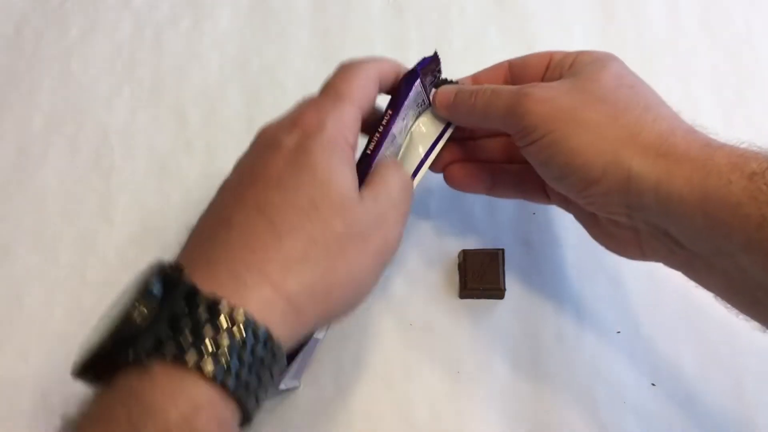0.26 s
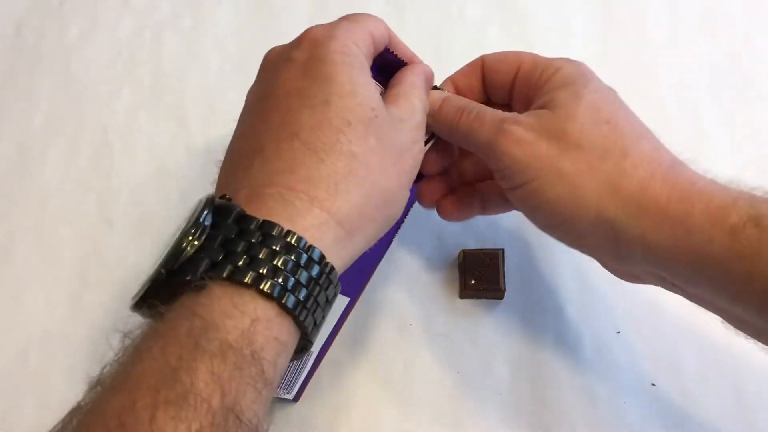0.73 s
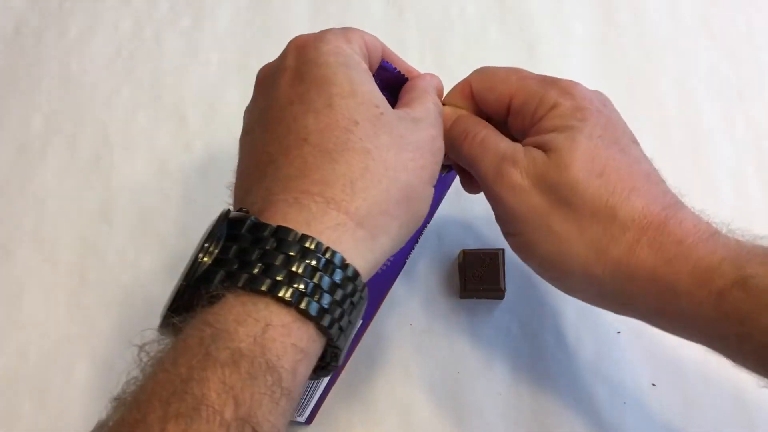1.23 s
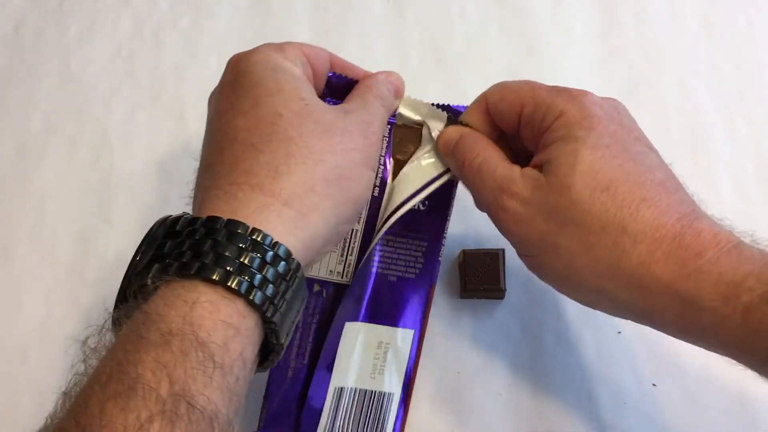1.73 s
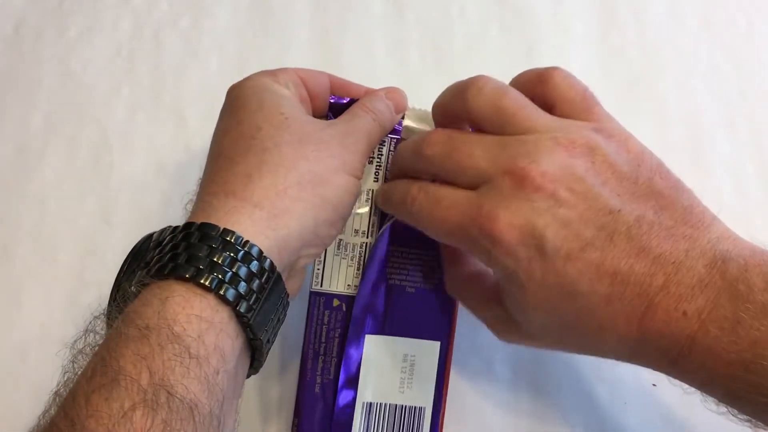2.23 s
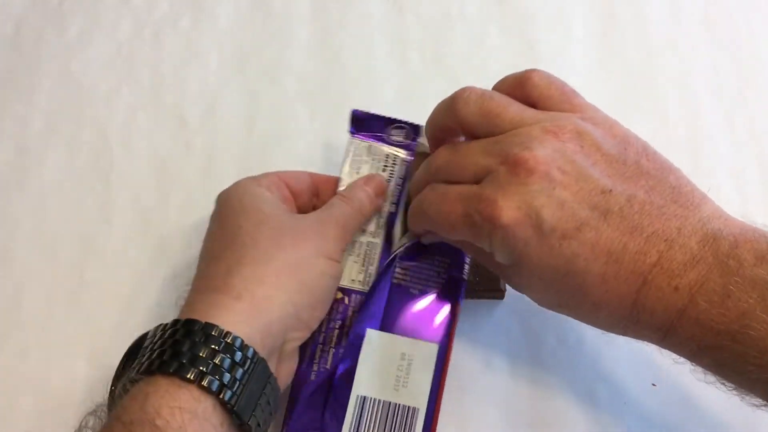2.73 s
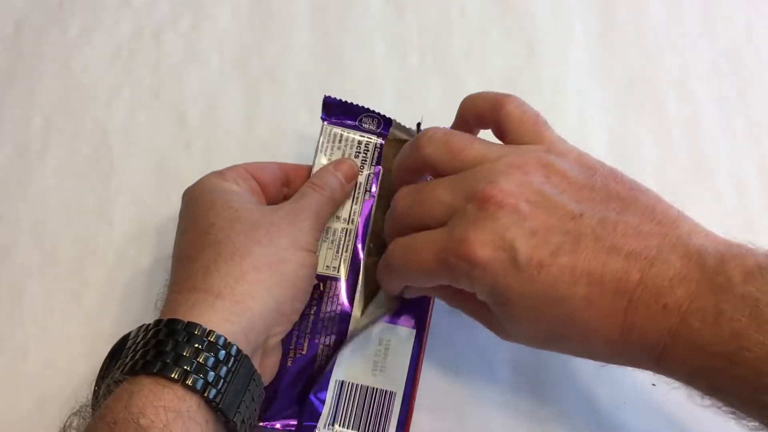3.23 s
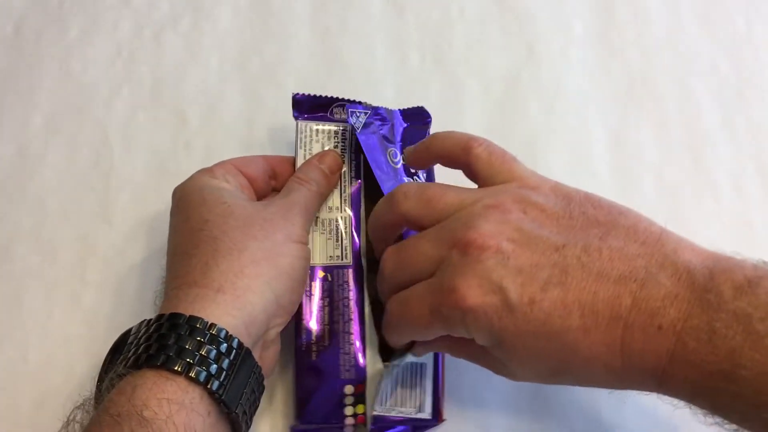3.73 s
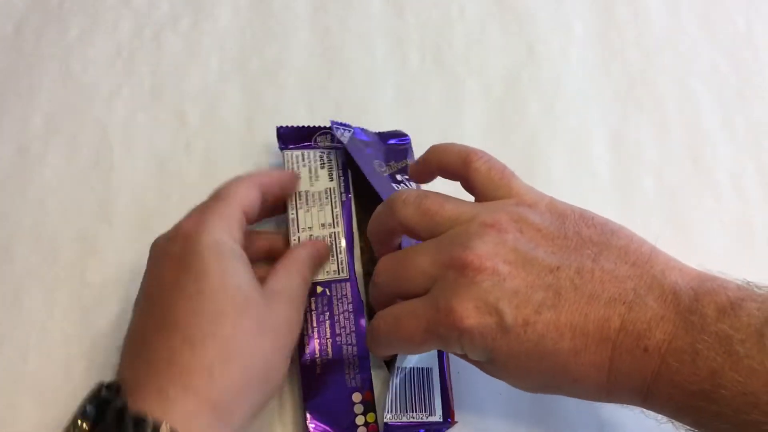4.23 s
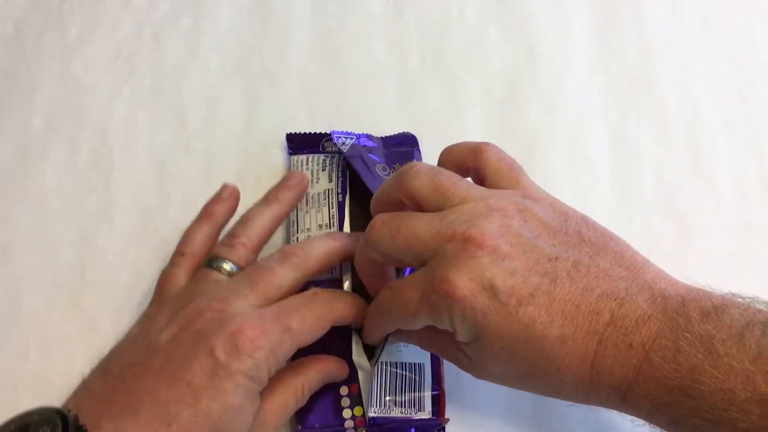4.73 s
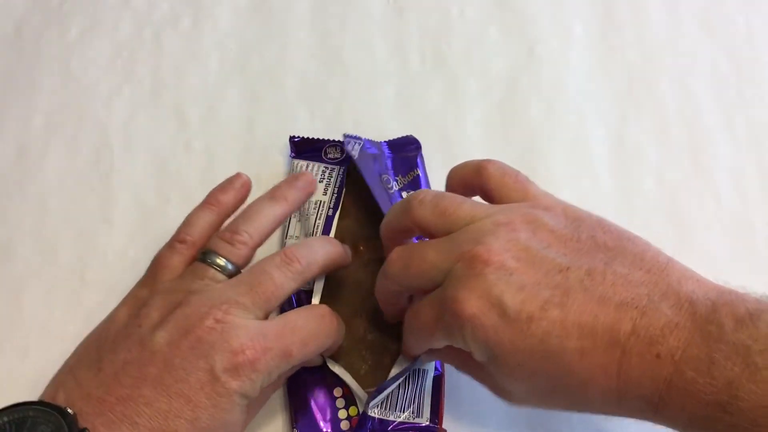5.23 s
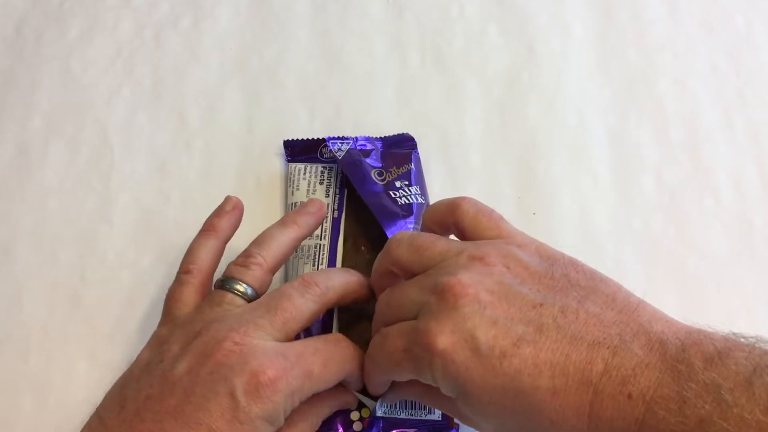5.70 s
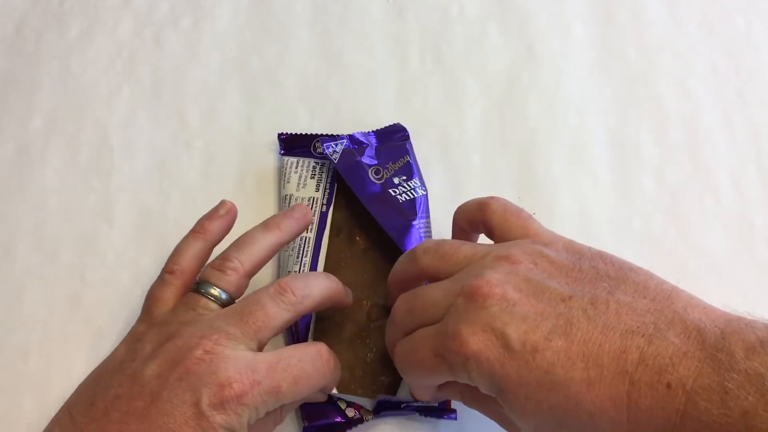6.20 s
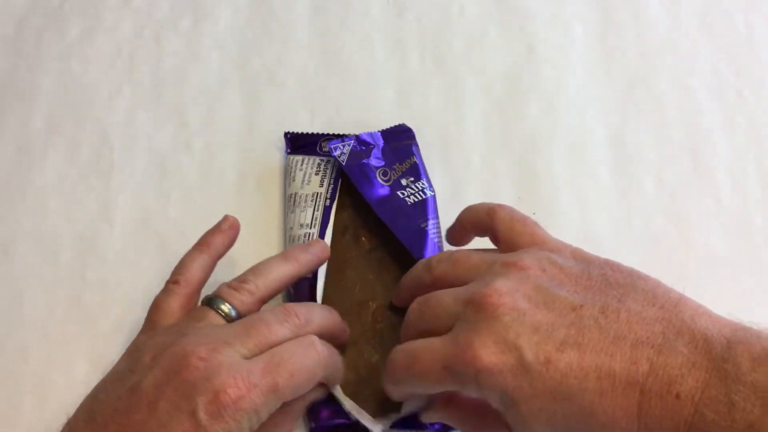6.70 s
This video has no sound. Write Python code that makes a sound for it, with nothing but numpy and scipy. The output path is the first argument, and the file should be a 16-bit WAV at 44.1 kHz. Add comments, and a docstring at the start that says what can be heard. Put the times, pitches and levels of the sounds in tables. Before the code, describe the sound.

A foil-and-paper chocolate wrapper is opened by hand on a table, close to the microphone in a small, quiet room with faint air. From 0 to 1.3 seconds there are light crinkles, small ticks and soft rustling, with barely felt hand thumps. At 1.4 a bright, sharp snap stands out, then lower, papery pops around 1.8 and 2.0. From 2.5 to 3 the crackling thickens; a strong, hollow papery pop comes at 3.2 and a hard double snap near 3.8. Around 4.4 a short, dull woody knock sounds with crisp cracks. Peeling continues in uneven bursts of rasp and foil hiss, with a sharp snap at 4.8, a bright one at 5.5 and more pops to 6.1. It then thins to faint rustling, a small tick at 6.5, and a last flurry of crinkles from 6.7 to the end.

```python
"""A foil-and-paper wrapper of a chocolate bar is peeled open by hand on a table, close to one microphone.
Creases snap: each gives a bright crack and rings a small flat facet of the sheet. Between snaps, shaped noise
and tiny chirping crinkles make the paper rasp and the foil hiss. Knocks ring the table's own notes and a slowly
swelling room mode, hand presses thump softly, and folds drag out short rough notes. Fading noise makes a small
room's echoes over faint air; a table reflection hollows the treble."""
import sys
import numpy as np
from scipy import signal
from scipy.fft import rfft, irfft, next_fast_len
from scipy.io import wavfile
from scipy.ndimage import uniform_filter1d, map_coordinates

SR = 44100
rng = np.random.default_rng(int(sys.argv[2]) if len(sys.argv) > 2 else 0)


def generate_wav(sig):
    """Save sig (samples, or channels by samples) to the path in sys.argv[1] as 16-bit PCM at SR."""
    pcm = np.round(np.clip(np.atleast_2d(sig).T, -1, 1) * 32767).astype(np.int16)
    wavfile.write(sys.argv[1], SR, pcm)


N = 306936  # length of the scene [samples]

# In all tables dB values are relative, and t60 is the time to fade by 60 dB.
# loud creases that buckle: (time [s], facet pitch [Hz], facet level [dB], crack level [dB])
LOUD_CREASES = [(0.0757, 4060, -27, -14), (0.1446, 5430, -5.5, -6), (0.2098, 2860, -7, -22),
                (0.434, 9000, -14.5, -25), (0.469, 2530, -7, -7), (0.641, 1750, -10, -19.5),
                (0.748, 2180, -13, -21), (0.7937, 1630, -21, -16), (0.921, 4050, -12.5, -14.5),
                (1.0349, 1950, -14.5, -23), (1.313, 1610, -16, -42), (1.407, 6100, 8, -1),
                (1.42, 1520, -9, -10), (1.4255, 1450, 1.5, -10), (1.454, 4900, -17, -12),
                (1.7563, 1910, -4, -27), (1.7887, 1320, -3, -26), (1.8285, 980, -4.5, -30),
                (1.8333, 1500, -6.5, -8.5), (2.023, 930, 1, -12), (2.032, 1100, -5.5, -6),
                (2.2344, 1230, 0, -5), (2.3751, 2540, -10, -24.5), (2.447, 2940, -16, -17.5),
                (2.535, 1000, -5.5, -18), (2.543, 3320, -8.5, -35), (2.6948, 4100, -2, -11),
                (2.771, 4730, -1.5, -10), (2.788, 1070, -6, -4), (2.8022, 1750, -1.5, -19),
                (2.836, 1550, 7, -8), (2.89, 1350, 3, -22), (2.9515, 1620, -15, -6.5),
                (2.9848, 1310, -4.5, -11), (3.0504, 1287, -2.5, -16.5), (3.1723, 3430, -8, -23),
                (3.2315, 1150, 13, -2), (3.264, 4700, -0.5, -14), (3.377, 2188, -4, -34),
                (3.3823, 1210, 6, -30), (3.492, 3090, -8, -18), (3.6954, 3480, 1.5, -6),
                (3.7278, 3050, -5, -19), (3.7742, 1440, 7, 1), (3.7781, 2300, 8.5, 0),
                (4.0065, 1865, -3, -18), (4.013, 3480, -7, -8), (4.13, 2090, -10.5, -24.5),
                (4.3939, 1110, 1.5, -25), (4.4154, 3280, -2, 0.5), (4.4253, 2570, -0.5, -4),
                (4.4954, 2163, -17, -12.5), (4.562, 1020, -10, -11.5), (4.6393, 3380, 3, -11),
                (4.711, 3600, -5.5, -27), (4.714, 970, -6.5, -30), (4.7917, 2750, -1, -21),
                (4.8078, 3290, 4, 3.5), (4.941, 4400, -3, -6), (4.975, 1050, -31, -5.5),
                (5.041, 1276, -3, -15.5), (5.142, 2473, -9, -12.5), (5.2058, 2060, 0.5, -3),
                (5.3503, 2370, -7, -9.5), (5.3729, 5540, -19, -17), (5.4064, 1108, -17.5, -17),
                (5.4171, 845, -12.5, -15), (5.5354, 6170, 8, -4.5), (5.5864, 870, 0, -4),
                (5.5906, 1030, -19, 1), (5.6404, 3500, -12, -15), (5.7142, 1750, -9.5, -12),
                (5.757, 963, -3, -3), (5.7652, 1930, -5, -9), (5.8815, 5200, -1, -9),
                (5.9111, 4000, -4, -16), (5.9552, 2500, 6, -2.5), (6.036, 1960, -6, -9),
                (6.0866, 2017, -3, -10.5), (6.1278, 4100, -10, -9), (6.5167, 2430, -16, -16.5),
                (6.708, 1210, -10, -30), (6.743, 1080, -4, -16), (6.768, 2440, -1.5, -9),
                (6.783, 1850, -6.5, -17), (6.8503, 6540, -16, -12.5), (6.8586, 1660, -7, -10)]
# blows on the table: (time [s], level [dB], contact time [s])
TABLE_BLOWS = [(.105, -41, 0.0044), (0.211, -52.5, 0.0037), (2.232, -49.5, 0.0006), (3.776, -58, 0.00058),
               (4.13, -51.5, 0.00022), (4.391, -34.5, 0.0002), (4.399, -30.5, 0.00082),
               (4.435, -30.5, 0.0011), (6.859, -45.5, 0.0021)]
# notes a blow sets ringing, mostly of the table with the bar on it, the 226 Hz one a mode of the room:
# (frequency [Hz], level [dB], t60 [s])
TABLE_MODES = [(50, -12, 0.43), (122.2, -11.5, 0.27), (162, -6.5, 0.26), (226, -5, 0.4), (336, -19, 0.25),
               (407, -9, 0.09), (476.6, -2, 0.16), (619, 6.5, 0.075), (680, -13, 0.58), (833, -9, 0.13),
               (1000, -12, 0.51), (1085, 3, 0.064)]
# tone colour of a crease's crack: (frequency [Hz], level [dB per Hz])
CRACK_SPECTRUM = [(200, -27.5), (1000, -9), (3000, -5), (6500, 1.5), (9500, -3), (13000, -7.5),
                  (15700, -14.5), (16500, -41)]
# tone colour of rasping paper: (frequency [Hz], level [dB per Hz])
PAPER_SPECTRUM = [(100, -12.5), (300, 5.5), (700, 1), (1100, 4.5), (2000, -10), (3500, 0.5), (7000, -22)]
# tone colour of hissing foil: (frequency [Hz], level [dB per Hz])
FOIL_SPECTRUM = [(1000, -9.5), (2400, 3.5), (3600, -3.5), (5000, 1), (6500, 1), (9500, -3), (15500, -7),
                 (16500, -45)]
# tone colour of the dull part of a blow: (frequency [Hz], level [dB per Hz])
THUD_SPECTRUM = [(22, -30), (50, 3), (150, -6), (650, 4), (1100, -9), (3000, -54)]
# tone colour of the quiet background air: (frequency [Hz], level [dB per Hz])
AIR_SPECTRUM = [(20, 4.5), (50, -6), (180, -6), (400, -25), (1000, -25.5), (7000, -23), (15000, -32.5)]
# how long the room's echoes last: (frequency [Hz], t60 [s])
ROOM_DECAY = [(1500, 0.59), (6000, 0.3), (15000, 0.18)]
# folds that drag over one facet: (time [s], length [s], facet pitch [Hz], level [dB])
FOLD_DRAGS = [(0.161, 0.48, 2320, -63), (0.171, 0.12, 6600, -69), (0.735, 0.017, 7700, -49.5),
              (1.09, 0.092, 6860, -57.5), (1.682, 0.018, 1480, -48), (1.868, 0.11, 7900, -52.5),
              (1.91, 0.069, 2150, -50.5), (2.226, 0.011, 4460, -35), (2.583, 0.079, 3100, -47),
              (2.631, 0.013, 3130, -35.5), (2.709, 0.031, 2280, -39), (3.393, 0.073, 4160, -53.5),
              (3.494, 0.11, 4230, -52), (4.875, 0.015, 8500, -42.5), (5.966, 0.22, 2260, -52.5)]
# finger moves that slide the sheet: (time [s], length [s], paper level [dB], foil level [dB])
FINGER_MOVES = [(0.0, 0.15, -71, -66), (0.181, 0.083, -60.5, -49.5), (0.33, 0.24, -69, -54),
                (0.645, 0.12, -64.5, -57.5), (1.4, 0.032, -70, -45.5), (1.576, 0.17, -62.5, -51.5),
                (1.722, 0.17, -61.5, -59.5), (2.1, 0.41, -69, -62.5), (2.583, 0.04, -58, -63),
                (2.625, 0.032, -59, -50.5), (2.765, 0.1, -62, -44.5), (3.022, 0.15, -62.5, -56.5),
                (3.247, 0.15, -56, -54), (3.523, 0.13, -56.5, -58), (3.733, 0.051, -47, -48.5),
                (3.934, 0.13, -57, -58.5), (4.15, 0.55, -70.5, -62), (4.397, 0.052, -48.5, -46.5),
                (4.519, 0.26, -56, -72), (4.865, 0.6, -59.5, -57.5), (5.52, 0.29, -57, -58),
                (5.845, 0.3, -59.5, -56.5), (6.214, 0.13, -67, -58.5), (6.471, 0.045, -62.5, -57),
                (6.735, 0.12, -53, -57)]
# presses of the heel of a hand on the table: (time [s], level [dB])
HAND_PRESSES = [(0.105, -53), (.283, -47), (2.636, -51)]
# centres of the narrow dips left by a short reflection off the table: (frequency [Hz])
TABLE_HOLLOWS = [2780, 5000, 7590, 10430]

HOLLOW_WIDTH_HZ, HOLLOW_DB = 247, -4
TOP_HZ = 17000  # nothing is kept at or above this
ATTACK_DB_PER_S, RELEASE_DB_PER_S = 548, 139  # a move takes hold quickly and lets go more slowly
HELD_PAPER_DB, HELD_FOIL_DB = -81.5, -77  # the sheet held still between the fingers
SETTLE_DB, SETTLE_DB_PER_S = -51, 255  # paper rustle after a snap, against its crack; how fast it fades
SMALL_PER_S, SMALL_LOW_HZ, SMALL_HIGH_HZ = 14, 1390, 5600  # small creases: rate and approximate pitch range
SMALL_FACET_DB, SMALL_CRACK_DB, SMALL_SPREAD_DB = 42.5, 29.5, 3.5  # over paper, over foil; scatter
YIELD_DB = -64  # paper level below which no small crease gives way
AFTER_DB, AFTER_S = -21, .05  # follow-on creases: level against their snap, spread in time
PRESS_HZ, PRESS_T60_S = 79, 0.068  # the padded, quickly damped note of a hand press


def amp(db):
    """Turn decibels into a gain."""
    return 10 ** (np.asarray(db) / 20)


def unit(x):
    """Scale a sound to an average (rms) size of 1."""
    return x / np.sqrt(np.mean(x ** 2) + 1e-20)


def along(points, hz):
    """Read a curve of (Hz, value) points on a log frequency axis."""
    f, v = np.transpose(points)
    return np.interp(np.log(hz + 1), np.log(f + 1), v)


def wobble(rate):
    """Make a smooth random curve through `rate` random points a second."""
    knots = rng.standard_normal(int(N * rate / SR) + 4)
    return map_coordinates(knots, [np.arange(N) * rate / SR])


def filtered(x, response):
    """Multiply the spectrum of x by a function of frequency."""
    size = next_fast_len(len(x) + 8192)
    hz = np.fft.rfftfreq(size, 1 / SR)
    return irfft(rfft(x, size) * response(hz), size)[:len(x)]


def coloured(x, spectrum):
    """Shape x by a spectrum and scale it to rms 1."""
    return unit(filtered(x, lambda hz: amp(along(spectrum, hz))))


def causal(gain):
    """Build the most abrupt short sound (impulse response) that has this gain at each frequency."""
    cepstrum = irfft(np.log(gain + 1e-6))
    half = len(cepstrum) // 2
    # folding the second half onto the first gathers the energy at the start
    cepstrum[1:half] *= 2
    cepstrum[half + 1:] = 0
    return irfft(np.exp(rfft(cepstrum)))


def add(track, s, sound):
    """Mix a sound into the track at time s [s]."""
    part = track[max(round(s * SR), 0):][:len(sound)]
    part += sound[:len(part)]


def friction():
    """Paper and foil levels [dB]: each move swells, holds and lets go; paper settles after each loud snap."""
    t = np.arange(N) / SR
    power = amp([[HELD_PAPER_DB], [HELD_FOIL_DB]]) ** 2 * np.ones(N)
    for s, length, paper_db, foil_db in FINGER_MOVES:
        rise_db = ATTACK_DB_PER_S * (t - s)
        fall_db = RELEASE_DB_PER_S * (s + length - t)
        shape_db = np.minimum(rise_db, fall_db)
        on = shape_db > -60
        power[:, on] += amp(np.minimum(shape_db[on], 0) + [[paper_db], [foil_db]]) ** 2
    for s, _, _, edge_db in LOUD_CREASES:
        settling_db = edge_db + SETTLE_DB - SETTLE_DB_PER_S * t[:SR // 2]
        add(power[0], s, amp(settling_db) ** 2)
    return 10 * np.log10(power)


def patchy(x):
    """The sheet keeps changing shape, so its resonances come and go within some 50 ms."""
    z = signal.stft(x, nperseg=256)[2]
    field = rng.standard_normal(z.shape)
    field = uniform_filter1d(field, size=5, axis=0)  # smooth over frequency
    field = uniform_filter1d(field, size=18, axis=1)  # smooth over time
    return signal.istft(z * amp(3.5 * unit(field)), nperseg=256)[1][:N]


def crackle(rate, low_hz, high_hz, life_s, size=768):
    """Tiny crinkles: short rough chirrs of random pitch and length, mostly weak, in clumps; rms 1."""
    chance = rate / SR * amp(5 * wobble(30))
    at = np.flatnonzero(rng.random(N) < chance)
    colour, force, span = rng.random((len(at), 3)).T[:, :, None]
    pitch = low_hz * (high_hz / low_hz) ** colour
    strength = amp(-5 * np.log(force + .08))
    age = np.arange(size) / SR / (life_s * (.5 + span))
    # random steps in the phase make each chirr rough
    jitter = np.sqrt(2 * pitch / SR) * rng.standard_normal((len(at), size))
    phase = np.cumsum(2 * np.pi * pitch / SR + jitter, axis=1)
    ticks = strength * age * np.exp(-age) * np.sin(phase)
    places = at[:, None] + np.arange(size)
    return unit(np.bincount(places.ravel(), ticks.ravel(), N + size)[:N])


def rustle(paper, foil, paper_db=-1, foil_db=-1, ticks=1.67):
    """Paper rasps and foil hisses: both tick finely, and more so when the paper flexes the film."""
    grip_db = 1.5 * wobble(35)
    flex = ticks * np.sqrt(amp(paper) / (amp(paper) + amp(foil)))
    paper_ticks = flex * crackle(85, 1100, 4000, life_s=.0009)
    foil_ticks = flex * crackle(130, 3000, 13000, life_s=.0007)
    # each layer also picks up some of the other's ticks
    rasp = coloured(patchy(rng.standard_normal(N)) + (paper_ticks + foil_ticks) / 2, PAPER_SPECTRUM)
    hiss = coloured(patchy(rng.standard_normal(N)) + foil_ticks + paper_ticks / 2, FOIL_SPECTRUM)
    return rasp * amp(paper + paper_db + grip_db) + hiss * amp(foil + foil_db + grip_db)


def quiet_air():
    """The quiet room's air is a faint, steady shaped noise."""
    return amp(-67.0) * coloured(rng.standard_normal(N), AIR_SPECTRUM)


def room(x, count=28):
    """Near walls and a spread-out tail; the echo pattern changes as the hands move, in `count` steps."""
    out = np.zeros(N)
    wall_db, tail_db = -19, -12.7
    for piece in np.array_split(np.arange(N), count):
        hz, t, z = signal.stft(rng.standard_normal(SR // 2), SR, nperseg=256)
        fade = amp(-60 * t / along(ROOM_DECAY, hz)[:, None])
        tail = signal.istft(z * fade, SR, nperseg=256)[1]
        echo = amp(tail_db) * tail / np.linalg.norm(tail)
        delays = rng.uniform(0, 0.015, size=12)  # wall echoes [s], before the shared 3 ms delay below
        echo[(delays * SR).astype(int)] += amp(wall_db) / np.sqrt(len(delays))
        add(out, piece[0] / SR + .003, signal.fftconvolve(x[piece], echo))
    return out


def snaps(creases, shiver, facet_db=0, crack_db=0, size=1024):
    """A crease flips: a bright crack and its facet's damped note, then the sheet shivers for a few ms."""
    out = np.zeros(N)
    t = np.arange(size) / SR
    hz = np.fft.rfftfreq(size, 1 / SR) + 1
    sharpness = 1.334  # higher makes the facet's note narrower
    shiver_rise_s, shiver_t60_s, lag_s = .0005, .009, .0003
    for s, pitch, ring_db, edge_db in creases:
        facet = amp(ring_db + facet_db) / (1 + (sharpness * (hz / pitch - pitch / hz)) ** 2)
        crack = amp(edge_db + crack_db + along(CRACK_SPECTRUM, hz))
        gain = np.hypot(facet, crack)
        push = rng.standard_normal(size) * amp(-60 * t / shiver_t60_s)
        push *= 1 - np.exp(-t / shiver_rise_s)
        push *= shiver / np.linalg.norm(push)
        push[0] = 1  # the flip itself
        # bending waves: the treble runs ahead, the facet's own note arrives lag_s later
        spread = np.exp(-4j * np.pi * lag_s * np.sqrt(hz * pitch))
        snap = irfft(rfft(causal(gain)) * rfft(push) * spread)
        level = np.sqrt(np.mean(gain ** 2)) / np.linalg.norm(snap)
        add(out, s - lag_s, snap * level)
    return out


def after_creases(count=2):
    """Each loud snap strains weaker creases nearby: (time [s], pitch [Hz], facet [dB], crack [dB])."""
    soonest_s, detune, scatter_db = .006, .35, 3
    creases = []
    for s, pitch, ring_db, edge_db in LOUD_CREASES:
        for _ in range(count):
            later = s + soonest_s + AFTER_S * rng.random() ** 2
            new_pitch = pitch * np.exp(rng.normal(0, detune))
            new_ring_db = ring_db + AFTER_DB + rng.normal(0, scatter_db)
            new_edge_db = edge_db + AFTER_DB + rng.normal(0, scatter_db)
            creases.append((later, new_pitch, new_ring_db, new_edge_db))
    return creases


def knocks(ring_db=-2.5, thud_db=-4.0, build=0.028):
    """Each blow rings the table top, and a mode of the room, over a dull thud; a longer contact leaves only the
    low modes."""
    out = np.zeros(N)
    t = np.arange(SR) / SR
    thud_rise_s, thud_t60_s = .002, .3
    waver_db, wavers_per_s = 3, 45
    for s, db, contact in TABLE_BLOWS:
        ring = np.zeros(SR)
        # the longest-lived modes take longest to build up; all waver under the resting hands
        for hz, level, t60 in TABLE_MODES:
            fade = amp(level - 60 * t / t60 + waver_db * wobble(wavers_per_s)[:SR])
            rise = 1 - np.exp(-t / (build * t60))
            ring += fade * rise * np.sin(2 * np.pi * hz * t)
        thud = coloured(rng.standard_normal(SR), THUD_SPECTRUM)
        thud *= amp(thud_db - 60 * t / thud_t60_s) * (1 - np.exp(-t / thud_rise_s))
        blow = filtered(amp(ring_db) * ring + thud, lambda hz: 1 / (1 + (hz * contact) ** 2))
        add(out, s, amp(db) * blow)
    return out


def bumps():
    """A soft press gives a brief low thump and leaves the table's lowest mode swaying."""
    out = np.zeros(N)
    t = np.arange(SR // 2) / SR
    sway_hz, sway_db, sway_t60 = TABLE_MODES[0]
    thump = amp(-60 * t / PRESS_T60_S) * np.sin(2 * np.pi * PRESS_HZ * t)
    sway = amp(sway_db - 60 * t / sway_t60) * np.sin(2 * np.pi * sway_hz * t)
    for s, db in HAND_PRESSES:
        add(out, s, amp(db) * (thump + sway))
    return out


def small_creases(paper, foil):
    """Lesser creases give way at random, louder as the sheet is worked harder; columns as loud creases."""
    at = np.flatnonzero((rng.random(N) < SMALL_PER_S / SR) & (paper > YIELD_DB))
    colour, facet, crack = rng.uniform(-1.05, 1, (len(at), 3)).T
    pitch = SMALL_LOW_HZ * (SMALL_HIGH_HZ / SMALL_LOW_HZ) ** ((colour + 1) / 2)
    ring_db = paper[at] + SMALL_FACET_DB + SMALL_SPREAD_DB * facet
    edge_db = foil[at] + SMALL_CRACK_DB + SMALL_SPREAD_DB * crack
    return list(zip(at / SR, pitch, ring_db, edge_db))


def scrapes():
    """Quick slips under a dragging fold sound one facet in a short swell; its pitch wanders as it bends."""
    out = np.zeros(N)
    sharpness, bend, bends_per_s = 3.8, .05, 18
    for s, length, pitch, db in FOLD_DRAGS:
        # about one sample in ten holds a slip
        slips = rng.standard_normal(SR // 2) * (rng.random(SR // 2) < .1)
        note = filtered(slips, lambda hz: 1 / (1 + 1j * sharpness * (hz / pitch - pitch / (hz + 1))))
        note = unit(note)
        # reading the note faster and slower bends its pitch
        reading_place = np.cumsum(1 + bend * wobble(bends_per_s)[:len(note)])
        note = map_coordinates(note, [reading_place])
        swell = signal.windows.hann(int(length * SR)) ** .5
        add(out, s, amp(db) * note[:len(swell)] * swell)
    return out


def scene():
    """Put wrapper and table together in a quiet room."""
    paper, foil = friction()
    sliding = rustle(paper, foil) + scrapes()
    creases = list(LOUD_CREASES) + after_creases() + small_creases(paper, foil)
    near = snaps(creases, shiver=.9) + sliding
    # the room hears the sheet from all sides, which evens out the ripple of each snap
    echoes = room(snaps(creases, shiver=0) + sliding)
    return (near + echoes + knocks() + bumps() + quiet_air())[None]


def record(dry):
    """The table's reflection hollows the treble; the deepest rumble and all above the band limit are cut."""
    low_cut = signal.butter(4, 38, "highpass", fs=SR, output="sos")
    hz = np.fft.rfftfreq(1024, 1 / SR)
    hollows = sum(np.exp(-((hz - centre) / HOLLOW_WIDTH_HZ) ** 2) for centre in TABLE_HOLLOWS)
    reflection = causal(amp(HOLLOW_DB * hollows))
    channels = []
    for x in dry:
        hollowed = signal.fftconvolve(x, reflection)[:N]
        without_rumble = signal.sosfilt(low_cut, hollowed)
        channels.append(filtered(without_rumble, lambda hz: hz < TOP_HZ))
    return np.array(channels)


dry = scene()
out = record(dry)
generate_wav(out)
```